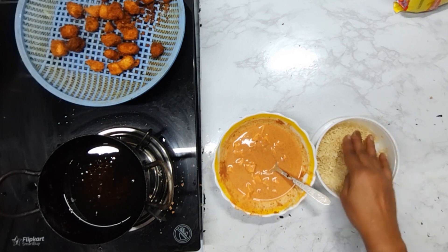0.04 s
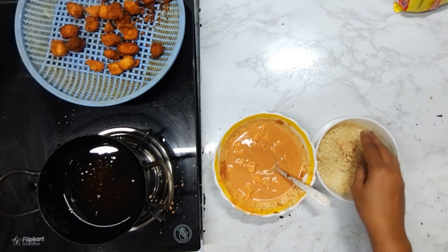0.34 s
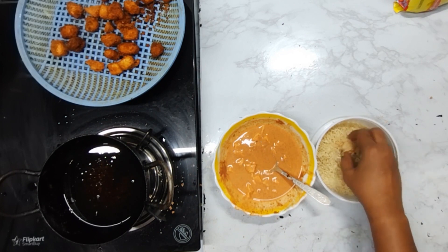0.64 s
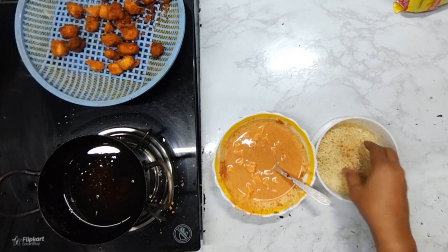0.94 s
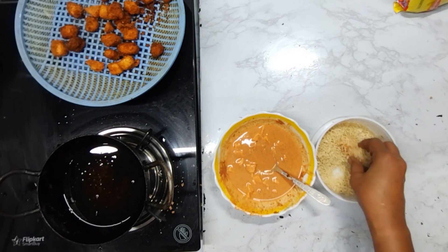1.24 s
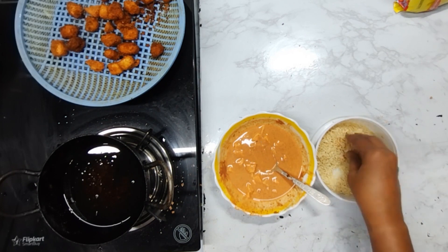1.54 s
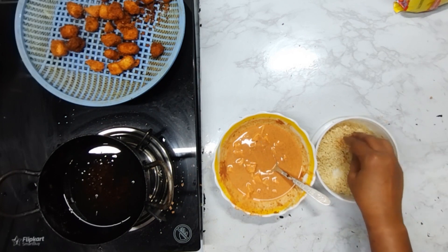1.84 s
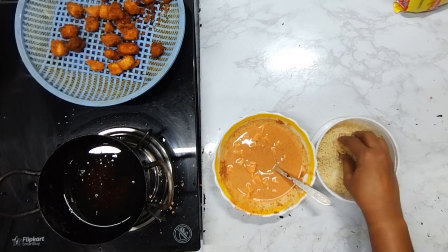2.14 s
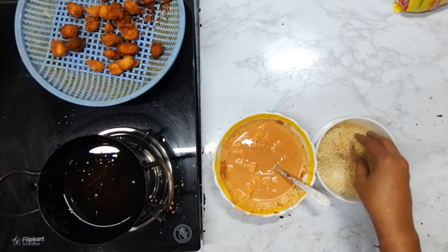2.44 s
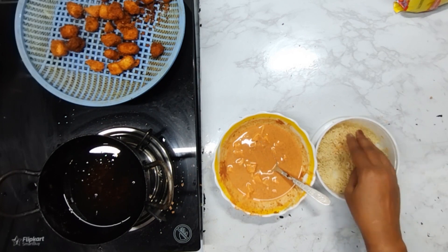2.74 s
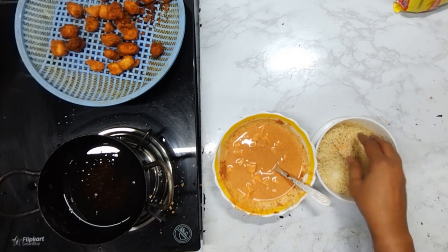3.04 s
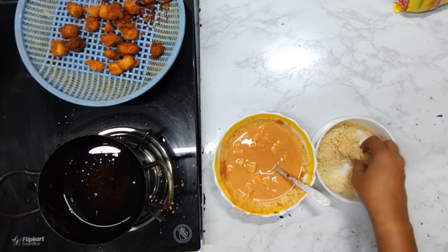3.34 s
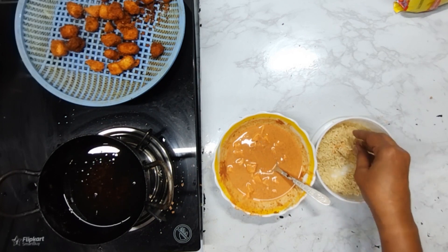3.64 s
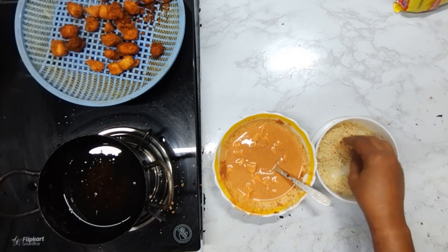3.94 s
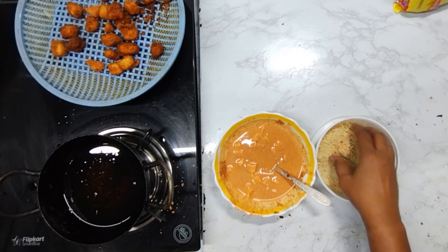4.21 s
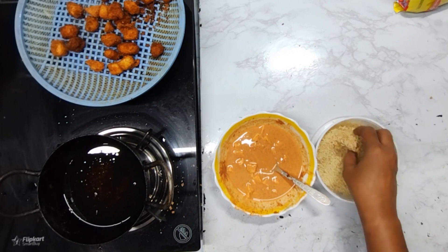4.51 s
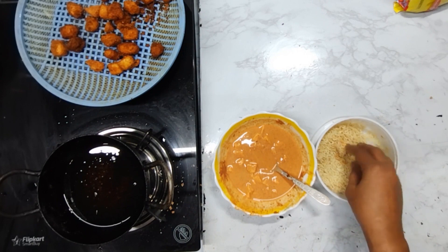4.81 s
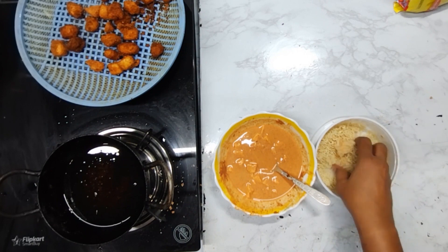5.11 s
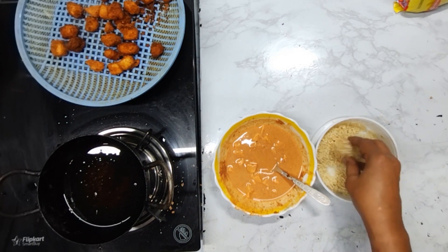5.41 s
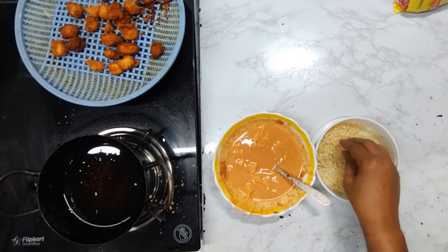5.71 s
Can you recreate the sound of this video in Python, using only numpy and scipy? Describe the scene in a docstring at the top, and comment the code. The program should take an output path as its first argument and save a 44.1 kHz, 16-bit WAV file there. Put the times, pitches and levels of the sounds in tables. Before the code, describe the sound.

A hand works dry crushed noodles in a plastic bowl, close by and slightly to the right. Each move is a soft shower of tiny cracks, crisp on the surface with a slightly hollow ring from the bowl, ending in a brief trickle of crumbs.

After two light pats, scoops come at about 0.6, 1.1 and 2.1 seconds, with short presses between and a cluster of small snaps around 1.5. Lighter pats follow until 3 seconds. A longer crunch at 3.2 carries a sharp snap, and scattered cracks continue to about 4. More scooping and squeezing comes at 4.3, 4.6 and 5.2, then quick presses and snaps until nearly 6 seconds.

The kitchen adds a light, short echo. Underneath lie a faint steady room hush, a thin wavering high whine and a low rumble that swells slightly around 4.5 seconds.

```python
"""Crushed noodles in a bowl

A hand scoops dry crushed noodles over a battered piece of food in a plastic bowl and presses them on.
Each move bites in, holds and settles in a shower of tiny cracks, with a few larger snaps.
Loose shards on top sound crisp; buried ones make the bowl ring. The counter and kitchen walls echo.
Behind it all lie room air, a thin high whine and a low rumble."""
import sys
import numpy as np
from scipy import signal
from scipy.fft import rfft, irfft, next_fast_len
from scipy.io import wavfile
from scipy.ndimage import uniform_filter1d, map_coordinates

SR = 44100
rng = np.random.default_rng(int(sys.argv[2]) if len(sys.argv) > 2 else 0)


def digitize_waveform(pressure):
    """Quantize a signal to 16-bit integers and store it at the path in sys.argv[1].

    Rows of a 2-D input are taken as channels; values are limited to [-1, 1].
    """
    field = np.atleast_2d(pressure).T
    bounded = np.clip(field, -1, 1)
    quanta = np.round(bounded * 32767).astype(np.int16)
    wavfile.write(sys.argv[1], SR, quanta)


N = 258732

# The pitches at which the bowl rings: f/Hz, width/Hz, relative level/dB
BOWL_RINGS = [(974, 46, -8), (1261, 81, 1), (1453, 63, 1.5), (1655, 13, -7), (1890, 18, 2), (2097, 17, -2),
              (2290, 47, -3.5), (2626, 122, 0), (2730, 77, -27), (3130, 16, -12), (4250, 140, -10)]
# The tone of cracks deep in the heap: f/Hz, relative level/dB
BURIED_TONE = [(60, -50), (250, -15.5), (500, -22), (800, -8), (1200, -11), (2000, 1.5), (2700, -5),
               (3500, -6.5), (6000, -20.5), (15000, -33)]
# The brighter tone of cracks on top: f/Hz, relative level/dB
CRISP_TONE = [(100, -57), (700, -22), (1800, -10.5), (3200, 0.5), (4500, -0.35), (6500, 0.5), (8000, -1),
              (10000, -8), (12000, -15), (15500, -22.5)]
# The deep tone of the thuds, also used for the background rumble: f/Hz, relative level/dB
BASS_TONE = [(25, -52), (45, -16), (66, 3), (90, -1), (125, 5.5), (170, -12), (280, -16.5), (600, -36.5)]
def noodles(buried_db=0.58, surface_db=3.0, thud_db=-31):
    """Buried cracks ring the bowl, top ones reach us directly, and each push thuds on the counter."""
    strength = hand_moves()
    buried, surface = tiny_cracks(strength) + snaps()
    body = hand_shading(convolved(buried, ringing(BURIED_TONE, BOWL_RINGS, ring_db=5.5)), patchy_db=2.5)
    crisp = hand_shading(convolved(surface, ringing(CRISP_TONE)), patchy_db=1.7)
    thud = strength[0] * noise(BASS_TONE, side_db=-32)
    body = hand_damping(body, strength[1])
    return amp(buried_db) * body + amp(surface_db) * crisp + amp(thud_db) * thud


# Fingers dig in and heap crumbs over the food. "Bite" is how far below full strength a move starts.
# t/s, swell/s, bite/dB, hold/s, level/dB, crispness/dB
HAND_SCOOPS = [(0.573, 0.13, 8, 0.032, -46.5, 0), (1.078, .11, 18.5, .025, -38.5, 1),
               (2.079, 0.08, 11, .02, -42, 0.5), (3.199, .059, 10, 0.17, -41.5, 1.5),
               (4.311, .014, 14.5, .175, -46.5, 1.5), (5.164, 0.023, 14.5, 0.09, -40, 0)]
# Short pats and longer squeezes on the heap: t/s, hold/s, level/dB, crispness/dB
HAND_PRESSES = [(0.065, 0.0037, -64, -1), (0.218, .016, -49.5, -0.5), (0.8, .03, -51.5, -2),
                (0.85, 0.0255, -48.5, -7), (1.311, .012, -48, -8), (1.51, 0.037, -58, -3),
                (1.578, 0.021, -57, 1), (1.653, .025, -56, -3), (1.842, 0.033, -57.5, 0),
                (2.405, .012, -52.5, -3), (2.462, .015, -61, -2), (2.707, 0.0139, -47, -3),
                (2.935, .004, -63.5, -6), (3.661, .19, -58, -2.5), (4.621, 0.13, -48.5, -3.5),
                (5.122, 0.024, -57, -4), (5.351, 0.039, -49, -7), (5.499, 0.084, -57.5, -3),
                (5.604, 0.11, -48, -6.5), (5.758, 0.05, -61, -1.5)]
def hand_moves():
    """All scoops and presses add their power, giving the buried and the surface strength over time."""
    moves = [push(*row, fall_db_per_s=112) for row in HAND_SCOOPS]
    swell_s, bite_db = .02, 14
    moves += [push(start, swell_s, bite_db, *row, fall_db_per_s=391) for start, *row in HAND_PRESSES]
    return np.sqrt(sum(move ** 2 for move in moves))


def push(start, swell_s, bite_db, hold_s, db, crisp_db, fall_db_per_s, rise_s=.009):
    """One move bites in, swells, holds and settles; the crunch gets duller as the fingers sink in."""
    age = np.maximum(np.arange(N) / SR - start, 0)
    released = np.maximum(age - swell_s - hold_s, 0)
    level = np.minimum(age / rise_s, 1) * amp(db - bite_db * np.maximum(1 - age / swell_s, 0))
    settled_db = fall_db_per_s * released
    sunk_db = np.clip(44 * (age - .13), 0, 9)  # after 0.13 s the top fades and the buried crunch grows
    trickle = amp(-21 - 60 * released)  # loose crumbs keep sliding after the move
    buried = amp(0.41 * sunk_db - settled_db)
    surface = amp(crisp_db) * np.hypot(amp(-sunk_db - settled_db), trickle)
    return level * np.array([buried, surface])


def tiny_cracks(strength, spread_db=1.53, tone_db=0.53, decay_s=0.00097, size=96):
    """Crumbs break at random times: a harder push breaks more of them each second."""
    force = strength[1] / amp(-50)
    per_second = np.clip(2700 * force ** .6, 300, 8000)
    starts = np.flatnonzero(rng.random(N) < per_second / SR)
    age = np.arange(size)
    places = (starts[:, None] + age).ravel()
    sizes_db = spread_db * np.minimum(rng.exponential(size=len(starts)), 4)
    layers = []
    for level in strength:
        # each crack splits its energy differently between the heap and the open air
        sizes = amp(sizes_db + tone_db * rng.standard_normal(len(starts)))
        waves = crack_waves(len(starts), np.exp(-age / (decay_s * SR))) * sizes[:, None]
        shower = np.array([np.bincount(places, side.ravel(), N + size)[:N] for side in waves])
        # even out the shower so that its loudness follows the hand
        power = uniform_filter1d(uniform_filter1d(np.mean(shower ** 2, axis=0), size=700), size=700)
        layers.append(level * shower / np.sqrt(np.abs(power) + 1e-4))
    return np.array(layers)


def crack_waves(count, shape, direct_share=0.33, lag_samples=3):
    """Each crack is a burst of noise: part reaches the right side first, the bowl scatters the rest."""
    direct, left, right = np.moveaxis(rng.standard_normal((count, 3, len(shape))), 1, 0) * shape
    late = np.pad(direct, ((0, 0), (lag_samples, 0)))[:, :len(shape)]
    scattered = np.sqrt(1 - direct_share) * np.array([left, right])
    return np.sqrt(direct_share) * np.array([late, direct]) + scattered


# Larger shards breaking one by one: t/s, level before evening out/dB, treble offset before boost/dB
SHARD_SNAPS = [(1.079, -34.5, -18.5), (1.368, -41.5, -27), (1.394, -36, -23), (1.427, -39, -11.5),
               (1.515, -30, -18), (1.594, -42, -7), (1.687, -45.5, -6.5), (2.346, -40, -20),
               (2.489, -48, -13), (3.218, -32, 1), (3.255, -22, -10.5), (3.426, -28, -27),
               (3.469, -30, -27), (3.525, -36, -26), (3.587, -38.5, -15), (3.643, -34, -20),
               (3.665, -35.5, -14.5), (3.856, -38.5, -15.5), (3.924, -43.5, -16.5), (4.134, -54.5, -17.5),
               (4.321, -42.5, 3), (4.629, -31, -15.5), (4.671, -35, -21.5), (4.715, -26, -9),
               (4.925, -38.5, -13.5), (5.131, -42, -17), (5.191, -27, -12), (5.38, -34, -15),
               (5.415, -28.5, -10.5), (5.506, -40.5, -16), (5.535, -39, -17), (5.613, -31, -24),
               (5.667, -28, -15), (5.692, -30.5, -29)]
def snaps(boost_db=11, attack_s=0.00061, fade_s=0.024, crumble_db=-16, crumble_s=0.13, squeeze=0.49):
    """A larger shard cracks sharply, then crumbles briefly."""
    layers = np.zeros((2, 2, N + SR))
    t = np.arange(SR // 10) / SR
    shape = (1 - np.exp(-t / attack_s)) * (amp(-60 * t / fade_s) + amp(crumble_db - 60 * t / crumble_s))
    typical_db = np.median([db for _, db, _ in SHARD_SNAPS])
    for start, db, treble_db in SHARD_SNAPS:
        # snaps louder than the typical one are turned down toward it
        db -= squeeze * max(db - typical_db, 0)
        at = round(start * SR)
        for layer, level_db in zip(layers, (db, db + treble_db + boost_db)):
            layer[:, at:at + len(t)] += amp(level_db) * crack_waves(1, shape)[:, 0] / 2
    knock, crack = layers[..., :N]
    # a clean break has a steeper edge, and so more treble, than grinding crumbs
    return np.array([knock, signal.lfilter([1, -0.14], 1, crack)])


def ringing(tone, rings=(), ring_db=0, size=4096):
    """What one click turns into: a broad tone, plus any ringing pitches on top."""
    hz = np.fft.rfftfreq(size, 1 / SR)
    power = amp(along(tone, hz)) ** 2
    for centre, width, db in rings:
        power += amp(db + ring_db) ** 2 / (1 + (2 * (hz - centre) / width) ** 2)
    # this folding puts the ringing after the click, never before it
    cepstrum = irfft(np.log(power + 1e-12) / 2)
    cepstrum[1:size // 2] *= 2
    cepstrum[size // 2 + 1:] = 0
    response = irfft(np.exp(rfft(cepstrum)))
    return response / np.linalg.norm(response)


def hand_shading(x, patchy_db, size=512):
    """The moving hand keeps changing which pitches escape from the bowl."""
    spectra = signal.stft(x, nperseg=size)[2]
    patches = uniform_filter1d(rng.standard_normal(spectra.shape[1:]), size=9, axis=0)
    patches = uniform_filter1d(uniform_filter1d(patches, size=9, axis=1), size=5, axis=1)
    return signal.istft(spectra * unit(amp(patchy_db * unit(patches))), nperseg=size)[1][:, :N]


def hand_damping(body, strength, firm_db=-42, low_hz=1250):
    """A firm push quiets the bowl's lowest ringing."""
    low = filtered(body, lambda hz: 1 / (1 + (hz / low_hz) ** 6))
    return body - low * strength / (strength + amp(firm_db))


# How long the wall echo takes to fade by 60 dB: f/Hz, fade/s
WALL_FADE = [(200, 0.6), (2000, 0.65), (6000, 0.65), (14000, 0.034)]
def kitchen(x, near_db=-8, near_fade_s=0.033, walls_db=-12):
    """The counter and the pots throw back quick echoes; the walls add a soft tail."""
    hz, t, spectra = signal.stft(rng.standard_normal((2, SR // 2)), SR, nperseg=256)
    tail = signal.istft(spectra * amp(-60 * t / along(WALL_FADE, hz)[:, None]), SR, nperseg=256)[1]
    age = np.arange(tail.shape[1]) / SR
    near = rng.standard_normal(tail.shape) ** 3 * amp(-60 * age / near_fade_s) * (age > .001)
    echoes = amp(walls_db) * tail / np.linalg.norm(tail, axis=1, keepdims=True)
    echoes += amp(near_db) * near / np.linalg.norm(near, axis=1, keepdims=True)
    return x + convolved(x, echoes)


def whine(db=-71.5, centre_hz=6480, width_hz=330, waver_db=2, wavers_per_s=9.5):
    """A thin, high band of noise whose loudness wavers at random."""
    band = filtered(rng.standard_normal((2, N)), lambda hz: np.exp(-((hz - centre_hz) / width_hz)**2 / 2))
    waver = map_coordinates(rng.standard_normal(N // 100), [np.arange(N) * wavers_per_s / SR])
    return amp(db) * unit(band * amp(waver_db * waver))


# How the rumble's two parts rise and fall: t/s, relative bass level/dB, relative rush level/dB
RUMBLE_SWELL = [(0.0, -70, -69), (0.13, -74, -76), (2.22, -75, -79), (2.99, -81, -88.5), (3.41, -74, -70),
                (3.55, -72.5, -83), (4.12, -65.5, -72), (4.28, -71, -62.5), (4.51, -55, -59.5),
                (4.9, -67, -68.5), (5.31, -68.5, -59.5), (5.57, -70, -78), (5.67, -68.5, -69),
                (5.87, -77, -74)]
# The tone of the low rushing sound: f/Hz, relative level/dB
RUSH_TONE = [(100, -27), (200, -7), (400, -2), (620, -7.5), (1100, -17.5), (3000, -57)]
def rumble(bass_db=-2, rush_db=-3, hum_db=-78, hum_hz=121):
    """Deep noise and a low rush swell and sink; a faint hum follows the deep part."""
    t = np.arange(N) / SR
    times, *levels = np.transpose(RUMBLE_SWELL)
    bass_swell, rush_swell = amp([np.interp(t, times, db) for db in levels])
    hum = amp(hum_db) * unit(bass_swell) * np.sin(2 * np.pi * hum_hz * t)
    bass = amp(bass_db) * bass_swell * noise(BASS_TONE, side_db=-13)
    rush = amp(rush_db) * rush_swell * noise(RUSH_TONE, side_db=-6)
    return bass + rush + hum


# The tone of the quiet room: f/Hz, relative level/dB
AIR_TONE = [(25, -42), (45, -19), (65, 4), (120, 4), (200, 3), (600, -8), (1250, -2), (2500, -9.5),
            (5000, -11), (11000, -18.5), (15000, -28)]
def room_air(db=-72):
    """A soft, steady hush from all around."""
    return amp(db) * noise(AIR_TONE, side_db=-1.5)


def noise(tone, side_db):
    """Stereo noise with the given tone; a lower side_db makes left and right more alike."""
    mid, side = filtered(rng.standard_normal((2, N)), lambda hz: amp(along(tone, hz)))
    return unit(np.array([mid + amp(side_db) * side, mid - amp(side_db) * side]))


def amp(db):
    """Turn decibels into a number to multiply by."""
    return 10 ** (np.asarray(db) / 20)


def unit(x):
    """Scale x to an average power of 1."""
    return x / np.sqrt(np.mean(x ** 2) + 1e-20)


def along(points, hz):
    """Read between the rows of a frequency table, on a pitch-like (log) scale."""
    freqs, values = np.transpose(points)
    return np.interp(np.log(hz + 1), np.log(freqs + 1), values)


def filtered(x, gain_at):
    """Turn each frequency of x up or down by gain_at(hz)."""
    size = next_fast_len(N + SR // 2)
    return irfft(rfft(x, size) * gain_at(np.fft.rfftfreq(size, 1 / SR)), size)[..., :N]


def convolved(x, response):
    """Give every sample of x the same ring or echo."""
    return signal.fftconvolve(np.atleast_2d(x), np.atleast_2d(response), axes=1)[:, :N]


def scene():
    """The bowl stands a little to the right, in front of the quiet background."""
    left_right = amp([[-.8], [1.1]])
    return kitchen(noodles()) * left_right + whine() + rumble() + room_air()


def record(dry, top_hz=15850):
    """Cut away the very highest treble."""
    return filtered(dry, lambda hz: hz < top_hz)


dry = scene()
out = record(dry)
digitize_waveform(out)
```